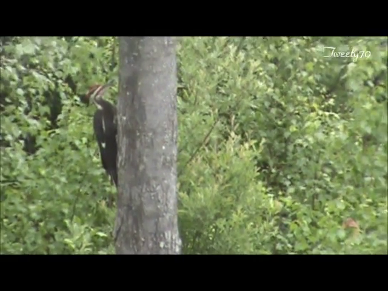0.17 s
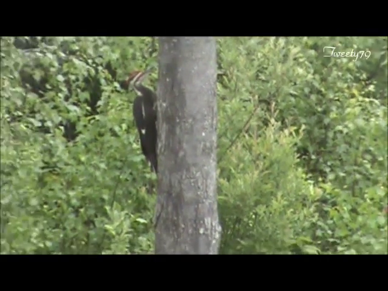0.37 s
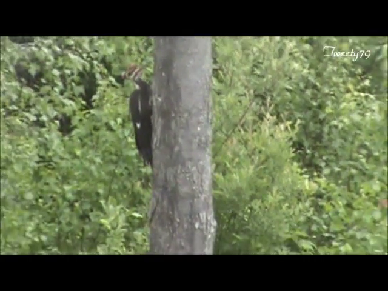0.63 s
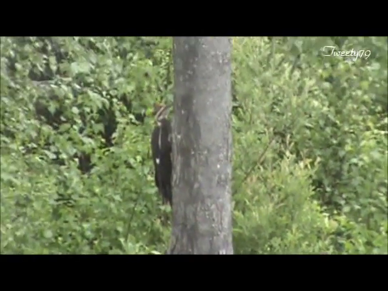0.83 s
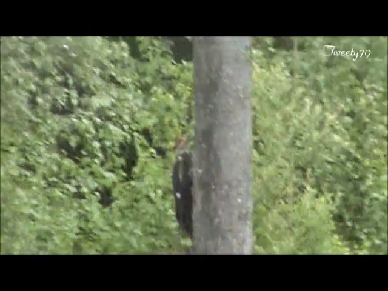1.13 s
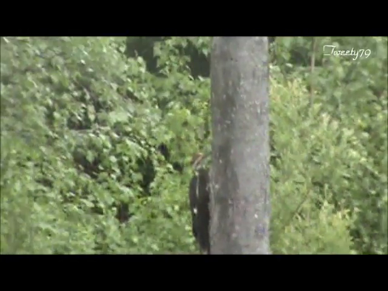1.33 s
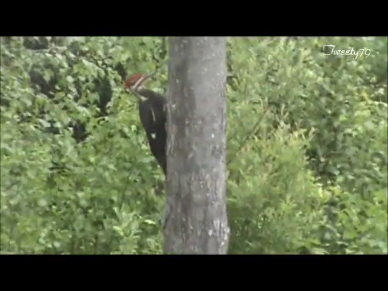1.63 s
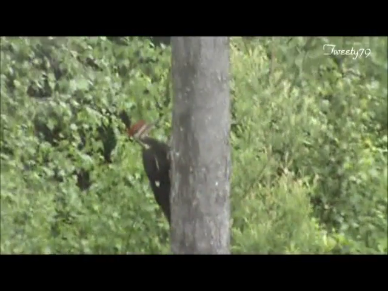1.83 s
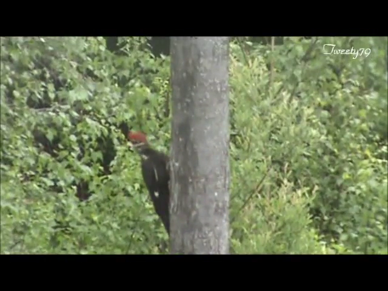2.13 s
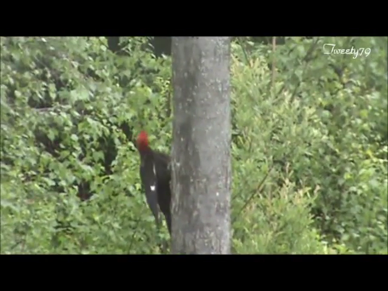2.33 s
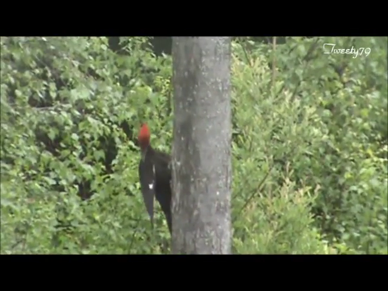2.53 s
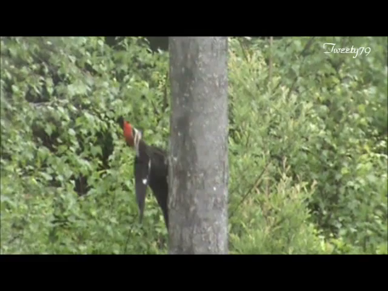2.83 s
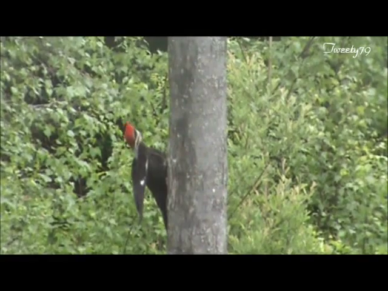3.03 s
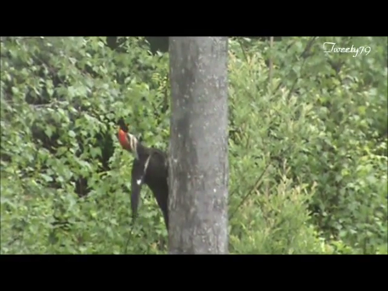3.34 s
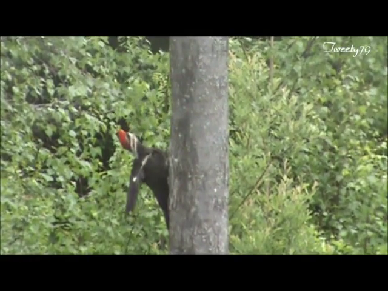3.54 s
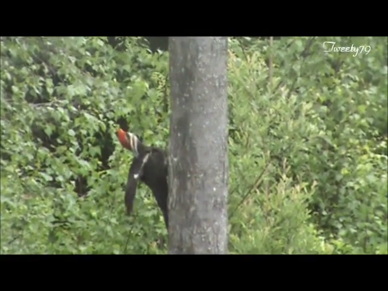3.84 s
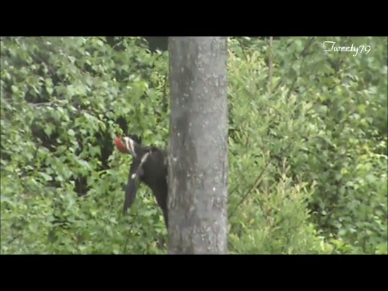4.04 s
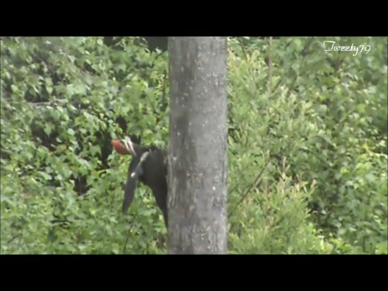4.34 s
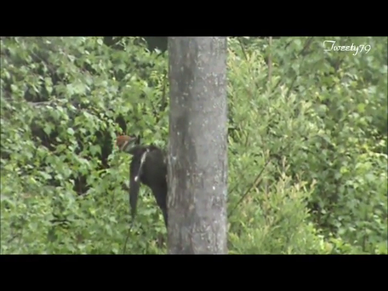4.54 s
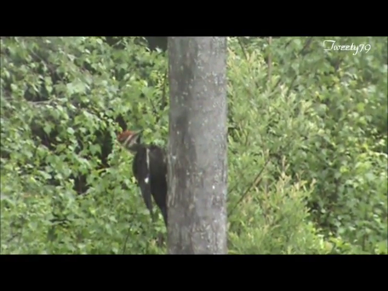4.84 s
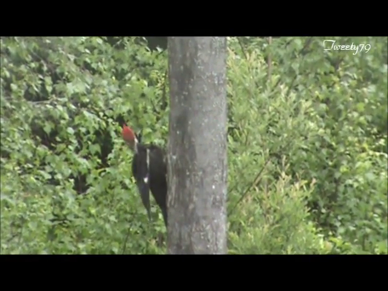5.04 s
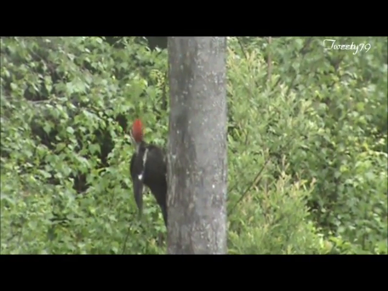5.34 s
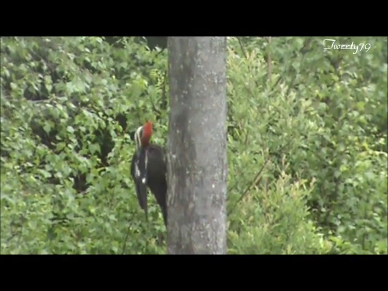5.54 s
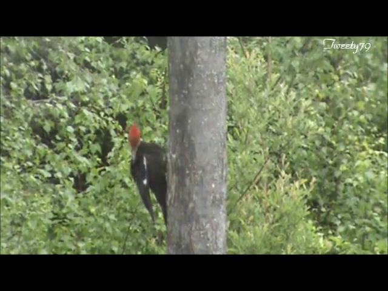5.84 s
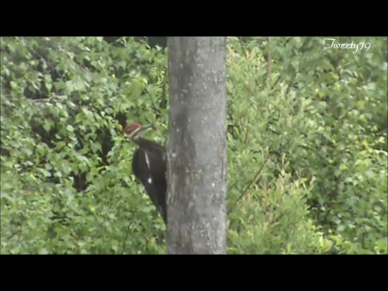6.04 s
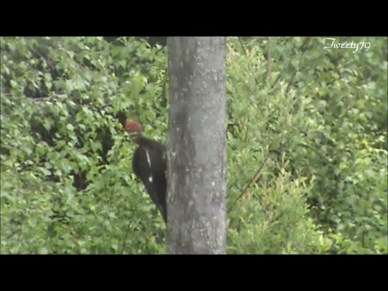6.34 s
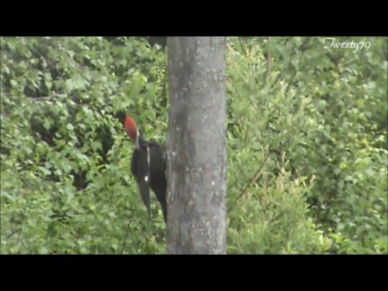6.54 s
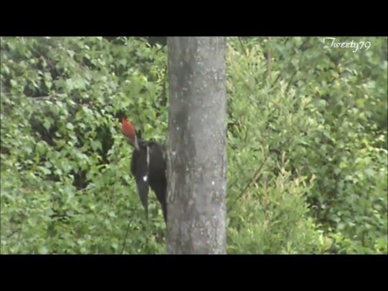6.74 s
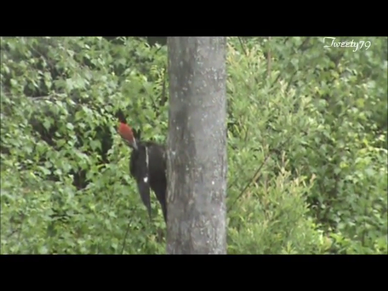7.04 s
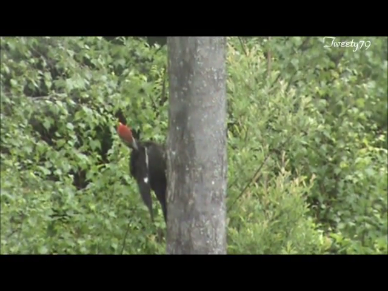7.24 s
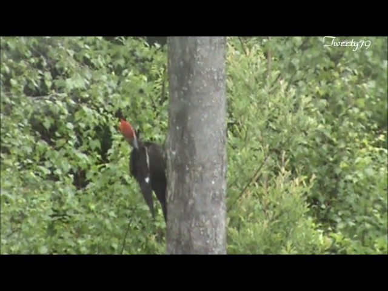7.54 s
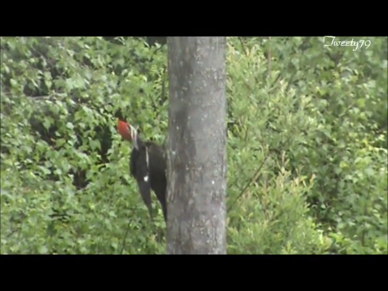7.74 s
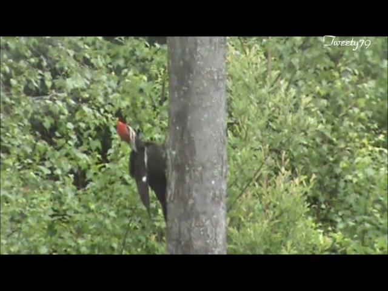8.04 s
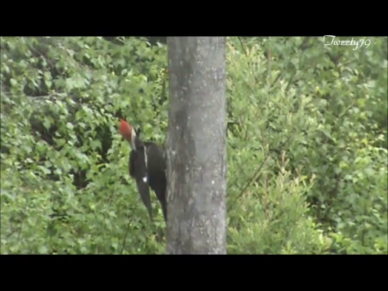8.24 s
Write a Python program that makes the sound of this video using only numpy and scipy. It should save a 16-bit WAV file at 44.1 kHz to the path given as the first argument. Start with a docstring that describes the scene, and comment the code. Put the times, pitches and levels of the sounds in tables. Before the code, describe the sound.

Short nasal calls from a woodpecker repeat and quicken near the end, echoing off trees over distant birdsong and one dull thump.

```python
"""Woodpecker calling in a wood

A pileated woodpecker gives a long run of nasal 'kuk' calls, with a quick flurry near the end. Its
voice box makes the tone, its throat and beak shape it, and the edge of the wood throws it back.
Small songbirds sing far off over a faint rumble, a hum and soft bumps, and something thumps once.
The calls overload the microphone's input, which flattens them and pops on some."""
import sys
import numpy as np
from scipy import signal
from scipy.fft import rfft, irfft, next_fast_len
from scipy.io import wavfile

SR = 44100
rng = np.random.default_rng(int(sys.argv[2]) if len(sys.argv) > 2 else 0)


def pcm_store(signal):
    """Save signal as 16-bit PCM."""
    levels = np.round(np.clip(np.atleast_2d(signal), -1, 1) * 32767)
    wavfile.write(sys.argv[1], SR, levels.astype(np.int16).T)


N = 369558


def gain_of(db):
    """Turns decibels (dB) into a number to multiply a sound by."""
    return 10 ** (np.asarray(db) / 20)


def unit_level(x):
    """Scales a signal so that its average size (rms) is 1."""
    return x / np.sqrt(np.mean(x ** 2) + 1e-20)


def level_at(curve, hz):
    """Reads the dB at any frequency from rows of (Hz, dB)."""
    row_hz, row_db = np.transpose(curve)
    return np.interp(np.log(hz + 1), np.log(row_hz + 1), row_db)


def coloured(x, curve):
    """Turns each frequency up or down by rows of (Hz, dB)."""
    size = next_fast_len(x.shape[-1] + 2048)
    gains = gain_of(level_at(curve, np.fft.rfftfreq(size, 1 / SR)))
    return irfft(rfft(x, size) * gains, size)[..., :x.shape[-1]]


def wander(count, rate_hz):
    """A smooth random wobble of size about 1; a higher rate moves faster."""
    size = next_fast_len(count + 4096)
    smoothing = np.exp(-(np.fft.rfftfreq(size, 1 / SR) / rate_hz) ** 2)
    return unit_level(irfft(rfft(rng.standard_normal(size)) * smoothing, size))[:count]


def add(mix, start_s, sound):
    """Mixes a sound in at a time, which may lie before the start."""
    start = round(start_s * SR)
    sound = sound[..., max(-start, 0):]
    part = mix[..., max(start, 0):][..., :sound.shape[-1]]
    part += sound[..., :part.shape[-1]]


def tree_echoes(fade, clump_db=2.5, clump_hz=70.5):
    """Tiny echoes off trunks and leaves, fading by rows of (seconds, dB), uneven as clumps answer."""
    delays, db = np.transpose(fade)
    t = np.arange(int(delays[-1] * SR)) / SR
    echoes = rng.standard_normal(len(t)) * (rng.random(len(t)) < .1)
    echoes *= gain_of(np.interp(t, delays, db, left=-100) + clump_db * wander(len(t), clump_hz))
    return echoes / np.linalg.norm(echoes)


LEAD_S, JUMP_S = .028, .015  # the lead-in and the jump start this long before the top pitch
ONSET_DB = -10.5  # level halfway through the jump


def kuk_shape(lead_db, attack_s=.0096, swell_s=.015, release_s=.02):
    """One call's path: a lead-in, a jump to the top pitch at time 0, a rough fall, a release."""
    forced = np.interp(lead_db, [3, 11], [0, 1])  # a forced call is longer, higher at first, hoarser
    honk_s = .036 + .0051 * forced
    lead_pitch = .64 + .11 * forced  # as a share of the top pitch
    t = np.arange(-LEAD_S, honk_s + release_s, 1 / SR)
    attack = np.clip((t + LEAD_S) / attack_s, 0, 1)
    jump = np.sin(np.pi / 2 * np.clip(1 + t / JUMP_S, 0, 1)) ** 2
    fall = np.clip(t / honk_s, 0, 1)
    release = np.clip((t - honk_s) / release_s, 0, 1)
    pitch_share = lead_pitch + (1 - lead_pitch) * jump - .22 * fall ** 2.184 - .56 * release
    db = np.interp(t, [-JUMP_S, -JUMP_S / 2, swell_s, honk_s], [lead_db - 24, ONSET_DB, 0, -6])
    db -= 41 * (release + (1 - attack) ** 2)
    rough = .07 * (1 - jump) + .017 * jump + .27 * fall ** 3 + .11 * forced
    return t, pitch_share, db, rough


# How the throat and beak shape the voice. Each row: frequency in Hz, level in dB.
THROAT_COLOUR = [(350, -43), (650, -14), (850, -11), (1030, -11), (1230, -18), (1450, 0.5), (1750, -2),
                 (2030, 1.5), (2300, -18), (3050, -23), (3600, -39), (4100, -20.5), (4500, -36.5),
                 (7000, -53.5)]
# Air rasping through the voice box. Each row: frequency in Hz, level in dB.
RASP_COLOUR = [(300, -30.5), (800, -1), (1900, -3.5), (2400, 4.5), (3300, -16), (5000, -17), (8000, -26)]


def kuk(top_hz, lead_db, beak_db, shrill_db, jitter=.11, shimmer=1.1, rasp_db=-9, breath=.01):
    """One nasal honk: each overtone of the voice box swells where the throat and beak ring."""
    t, pitch_share, db, rough = kuk_shape(lead_db)
    sway = .008 * wander(len(t), 60)  # no two calls bend quite alike
    hz = top_hz * pitch_share * (1 + sway + jitter * rough * wander(len(t), 960))
    cycles = np.cumsum(hz) / SR
    harmonic = np.arange(1, 9)[:, None]  # multiples of the pitch; the second carries the honk
    tone_hz = harmonic * hz
    tone_db = level_at(THROAT_COLOUR, tone_hz)
    tone_db += beak_db * np.exp(-((tone_hz - 2040) / 780) ** 2)
    tone_db += shrill_db * np.exp(-((tone_hz - 3900) / 330) ** 2)
    tone_db += (harmonic == 1) * 5 * np.clip(.5 - t / JUMP_S, 0, 1)  # the call opens hollow
    # The upper tones fade when the voice is soft, and blur as it turns rough.
    upper = harmonic > 2
    tone_db += upper * .58 * np.minimum(db - ONSET_DB, 0)
    wobbles = np.array([wander(len(t), 450) for _ in harmonic])
    blur = upper * 4 * (rough + breath) * np.sqrt(harmonic) * wobbles
    voice = np.sqrt(2) * (gain_of(tone_db) * np.sin(2 * np.pi * harmonic * cycles + blur)).sum(0)
    voice *= 1 + shimmer * rough * wander(len(t), 280)
    airflow = unit_level(coloured(rng.standard_normal(len(t)), RASP_COLOUR))
    rasp = gain_of(rasp_db) * (breath + rough) * airflow
    return (voice + rasp) * gain_of(db)


# The calls. Each row: time of the top pitch in seconds, top pitch in Hz, level in dB,
# far echo in dB compared with the call.
CALLS = [(-.19, 1029, -18.5, -11.5), (.178, 1026, -14, -10.5), (0.509, 1057, -13.5, -15),
         (.822, 1016, -15.5, -12.5), (1.344, 1028, -16.5, -11.5), (2.047, 1050, -16.5, -8),
         (2.521, 1044, -16, -9.5), (3.07, 1031, -16.5, -9.5), (3.439, 1033, -16, -9.5),
         (3.856, 1038, -16.5, -10.5), (4.234, 1032, -15.5, -12.5), (4.53, 1039, -16.5, -12),
         (5.238, 1036, -15.5, -11), (5.666, 1019, -14.5, -9.5), (6.111, 1017, -15.5, -9.5),
         (6.53, 1032, -16, -9.5), (6.812, 993, -16, -8.5), (6.986, 980, -16.5, -9.5),
         (7.212, 1030, -19, -7.5), (7.411, 1028, -18.5, -10), (7.665, 1036, -21, -3.5),
         (7.867, 1030, -21.5, -8), (8.074, 1035, -16, -15), (8.352, 1045, -16, -11)]
# How the voice changes. Each row: time in seconds, then boosts in dB for the lead-in,
# the ring of the beak and the shrill edge.
VOICE_CHANGES = [(0.199, 3, -4, -1), (4.2, -6.5, 0.5, -1), (5.301, -0.5, -4, -5.5), (6.6, 2.5, -2, 0.5),
                 (6.9, 6.5, -3, 3.5), (7.409, 12, 6.5, 5.5), (7.869, 16, 2, 9), (8.069, 11.5, -17, 4),
                 (8.35, 5, -4.5, 12.5)]
# Echoes off the ground and nearest trunks. Each row: delay in seconds, level in dB.
NEAR_ECHOES = [(.0115, -18), (.0165, -10), (.0235, -15), (.031, -21)]
# How the wood's echo swells and fades, its tail cut short by noise suppression.
# Each row: delay in seconds, level in dB.
FAR_ECHO_SHAPE = [(.004, -6), (.02, 0.5), (.045, 3), (.07, 2.5), (.11, -6), (.16, -11), (.19, -19.5),
                  (.24, -29), (.4, -39), (.6, -55.5)]
# The tone of that echo. Each row: frequency in Hz, boost in dB.
WOOD_COLOUR = [(500, -11.5), (1000, 5.5), (2000, 3.5), (3000, -3.5), (4100, -.5), (6000, -5.5),
               (9000, -10.5)]


def woodpecker(near_db=-3.5, far_db=-3):
    """Calls arrive directly and off nearby trunks (near), and scattered by the wood (far)."""
    direct, far = np.zeros((2, N))
    times, *boosts = np.transpose(VOICE_CHANGES)
    for top_s, top_hz, db, echo_db in CALLS:
        lead_db, beak_db, shrill_db = (np.interp(top_s, times, boost) for boost in boosts)
        call = gain_of(db) * kuk(top_hz, lead_db, beak_db, shrill_db)
        echo = signal.fftconvolve(call, tree_echoes(FAR_ECHO_SHAPE))
        add(direct, top_s - LEAD_S, call)
        add(far, top_s - LEAD_S, gain_of(echo_db) * echo)
    near = direct.copy()
    for delay_s, db in NEAR_ECHOES:  # these beat against the falling pitch
        add(near, delay_s, gain_of(db) * direct)
    return gain_of(near_db) * near, gain_of(far_db) * coloured(far, WOOD_COLOUR)


# The tone of the outdoor air. Each row: frequency in Hz, relative level in dB.
AIR_COLOUR = [(25, -29), (60, -18), (100, -6.5), (170, 1.5), (300, -1.5), (450, -8.5), (750, -9.5),
              (1000, -10.5), (1300, -17.5), (2000, -14.5), (2500, -21.5), (5000, -29.5), (7500, -40),
              (10000, -37), (15000, -42)]


def outdoor_air(level_db=-66):
    """A steady low rumble with a faint hiss on top."""
    return gain_of(level_db) * unit_level(coloured(rng.standard_normal(N), AIR_COLOUR))


# The tones of the hum. Each row: pitch in Hz, relative level in dB.
HUM_TONES = [(304, 1.5), (380, -15), (455, -11)]
# How the hum rises and fades. Each row: time in seconds, level in dB.
HUM_SWELL = [(0, -81.5), (3.5, -72), (3.62, -53.5), (4.05, -57), (4.3, -67.5), (6.2, -75)]


def far_hum(waver_hz=16):
    """Three wavering low tones, far away, that swell once."""
    t = np.arange(N) / SR
    hum = np.zeros(N)
    for hz, db in HUM_TONES:
        angle = 2 * np.pi * hz * t
        hum += gain_of(db) * (wander(N, waver_hz) * np.cos(angle) + wander(N, waver_hz) * np.sin(angle))
    return gain_of(np.interp(t, *np.transpose(HUM_SWELL))) * hum


def soft_note(hz, buzz):
    """A tone that fades in and out along a pitch curve; a fast pitch wobble makes it buzz."""
    cycles = np.cumsum(hz * (1 + buzz * wander(len(hz), 500))) / SR
    return np.sqrt(2) * np.sin(2 * np.pi * cycles) * signal.windows.tukey(len(hz), .8)


# Soft bumps in the distance. Each row: start in seconds, pitch in Hz, level in dB.
BUMPS = [(.33, 218.4, -60.5), (1.458, 228, -55.5), (2.458, 176.7, -55), (5.042, 188, -60),
         (6.642, 250, -53.5)]


def far_bumps(length_s=.067):
    """Short, dull swells that stand just above the rumble."""
    bumps = np.zeros(N)
    for start_s, hz, db in BUMPS:
        add(bumps, start_s, gain_of(db) * soft_note(np.full(int(length_s * SR), hz), buzz=.25))
    return bumps


# One bird repeats a phrase. Each row: start in seconds, stretch of the note spacing, boost in dB.
SONGS = [(0.866, 0.86, -0.5), (2.123, 0.92, -2.5), (5.806, 1, 0), (7.745, 0.91, -4.5)]
# The notes of that phrase. Each row: seconds into it before stretching, top pitch in Hz, level in dB.
PHRASE_NOTES = [(0, 6730, -61), (0.086, 5940, -58), (0.201, 5690, -56.5), (.282, 5000, -49.5),
                (0.344, 3930, -51)]
# Other birds whistle. Each row: start in seconds, length in seconds, pitch in Hz, level in dB,
# buzz as a share of the pitch.
WHISTLES = [(2.605, .22, 3860, -54.5, 0.053), (2.963, 0.08, 3810, -53.5, 0.043),
            (4.73, .16, 7140, -72, 0.017), (6.406, 0.21, 6350, -66.5, 0.0041),
            (6.624, 0.098, 5240, -62, 0.0057), (6.756, 0.18, 6290, -64, 0.0072),
            (7.102, 0.086, 6350, -71, 0.0069), (7.285, .11, 4570, -59.5, .02)]


def songbirds(note_s=.051, whistle_sag=.015, direct_db=-11, echo_s=.34):
    """Arched notes that step down, and thin whistles, blurred by the trees they pass through."""
    song = np.zeros(N)
    arch = 1 - .16 * (2 * (np.linspace(0, 1, int(note_s * SR)) - .3)) ** 2
    for start_s, stretch, song_db in SONGS:
        for after_s, top_hz, db in PHRASE_NOTES:
            note = soft_note(top_hz * arch, buzz=.04)
            add(song, start_s + after_s * stretch, gain_of(song_db + db) * note)
    for start_s, length_s, hz, db, buzz in WHISTLES:
        sag = 1 + whistle_sag * np.linspace(.5, -.5, int(length_s * SR))
        add(song, start_s, gain_of(db) * soft_note(hz * sag, buzz))
    trees = tree_echoes([(0, 0), (.03, -5), (echo_s, -55)])
    return gain_of(direct_db) * song + signal.fftconvolve(song, trees)[:N]


# A dull far thump and its echo. Each row: start in seconds, peak level in dB.
THUMPS = [(7.257, -22.5), (7.385, -27.5)]
# The tones it rings with. Each row: pitch in Hz, relative level in dB, seconds to fade by 60 dB.
THUMP_TONES = [(216, -7, 0.073), (308.6, -1, 0.1), (462, -4.5, 0.046)]


def far_thump(rise_s=.0059, echo_db=-6, echo_s=.55):
    """A soft blow on something hollow, with a low tail of echoes from the wood."""
    t = np.arange(SR // 4) / SR
    ring = sum(gain_of(db - 60 * t / fade_s) * np.sin(2 * np.pi * hz * t)
               for hz, db, fade_s in THUMP_TONES)
    ring *= 1 - np.exp(-(t / rise_s) ** 2)
    thumps = np.zeros(N)
    for start_s, db in THUMPS:
        add(thumps, start_s, gain_of(db) * ring / abs(ring).max())
    trees = tree_echoes([(0, 0), (echo_s, -60)])
    return thumps + gain_of(echo_db) * signal.fftconvolve(thumps, trees)[:N]


def scene(balance_db=.3, echo_width_db=-23, air_width_db=-26, air_swell_db=2.2):
    """Nearly mono: the woodpecker a little to the left, its echoes and the air a little wider."""
    near, far = woodpecker()
    bird = (near + far) * gain_of([[balance_db], [-balance_db]])
    # Adding a sound on the left and subtracting it on the right gives width.
    side = gain_of(echo_width_db) * signal.hilbert(far, next_fast_len(N)).imag[:N]
    side += gain_of(air_width_db) * outdoor_air()
    distant = songbirds() + far_thump() + far_bumps()
    air = outdoor_air() * gain_of(air_swell_db * wander(N, 3.9))
    return bird + np.array([side, -side]) + distant + air + far_hum()


# Pops from the overloaded input. Each row: start in seconds, length in seconds,
# which peaks flip (1 for the upper ones, -1 for the lower).
POPS = [(3.0878, .0006, 1), (3.4579, .0052, 1), (3.8774, .0008, -1), (3.878, .0008, 1),
        (4.2513, 0.0009, -1), (4.2527, .0013, 1), (7.4249, .003, 1), (7.4295, .005, 1), (7.4636, .00057, 1),
        (7.683, .0009, 1), (7.711, .0006, 1)]


def overload(sound, ceiling_db=-16.5, flip_from=.12, flip_depth=1.645):
    """The input flattens loud wave peaks and, at the listed times, flips them over with a pop."""
    ceiling = gain_of(ceiling_db)
    drive = sound / ceiling
    flattened = drive / (1 + abs(drive) ** 16) ** (1 / 16)
    upper, lower = np.zeros((2, N))
    for start_s, length_s, side in POPS:
        add(upper if side > 0 else lower, start_s, np.ones(int(length_s * SR)))
    flips = np.where(flattened > 0, upper, -lower) * np.minimum(abs(flattened) / flip_from, 1) ** 2
    return ceiling * (flattened - flip_depth * flips)


# How well the microphone hears low and high sounds. Each row: frequency in Hz, level in dB.
MIC_COLOUR = [(20, -42), (60, -19), (120, -1), (250, 0), (5500, 0), (7200, -6), (8200, -25), (9200, -39),
              (12500, -36), (14300, -36)]


def record(dry, mirror_hz=16200, mirror_db=-58.5, hiss_db=-94, cutoff_hz=15100):
    """The microphone overloads, colours the sound, adds its own hiss and loses the highest treble."""
    sound = coloured(overload(dry), MIC_COLOUR)
    # A low sampling rate leaves a faint mirror image of the sound in the high treble.
    sound *= 1 + 2 * gain_of(mirror_db) * np.cos(2 * np.pi * mirror_hz * np.arange(N) / SR)
    sound += gain_of(hiss_db) * rng.standard_normal(N)
    treble_cut = signal.firwin(511, cutoff_hz, window=("kaiser", 9), fs=SR)
    return signal.oaconvolve(sound, treble_cut[None], "same")


dry = scene()
out = record(dry)
pcm_store(out)
```